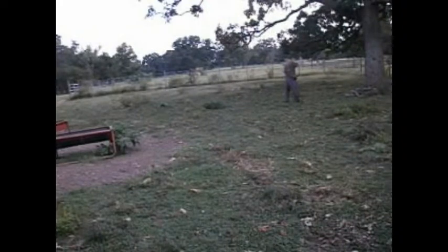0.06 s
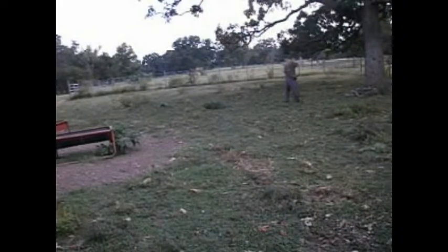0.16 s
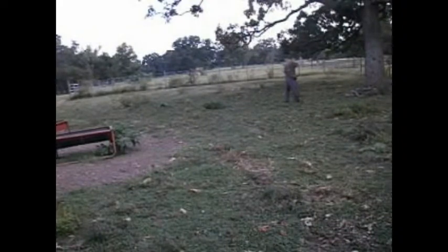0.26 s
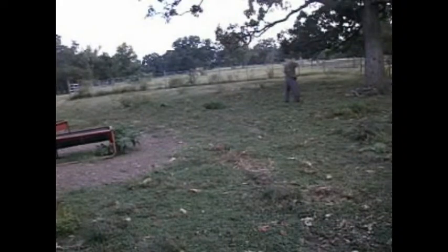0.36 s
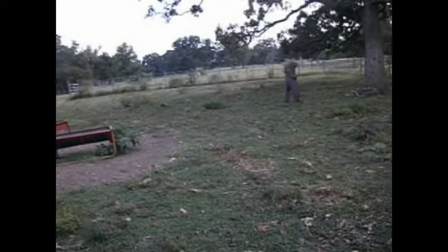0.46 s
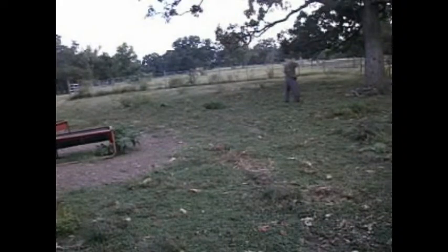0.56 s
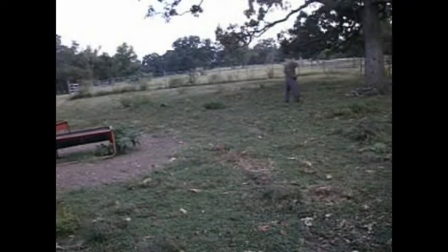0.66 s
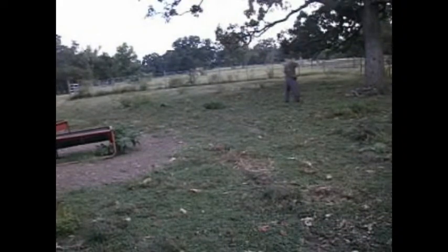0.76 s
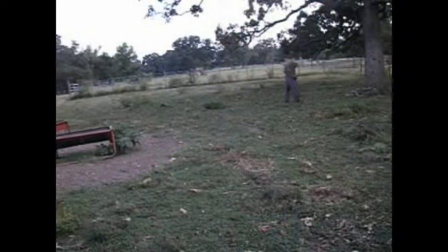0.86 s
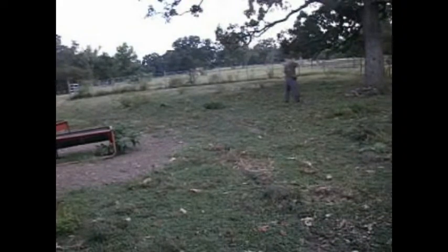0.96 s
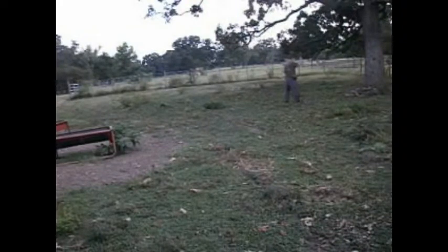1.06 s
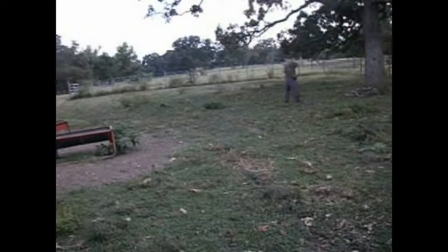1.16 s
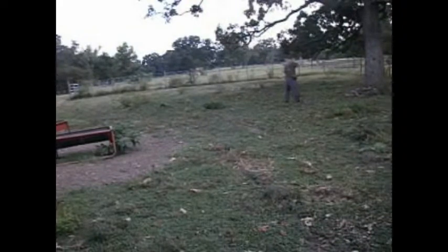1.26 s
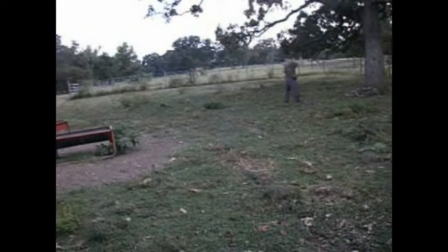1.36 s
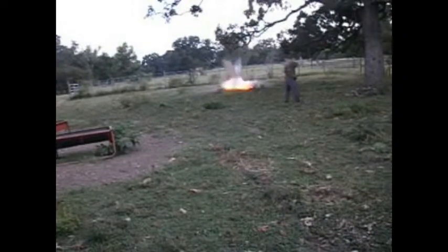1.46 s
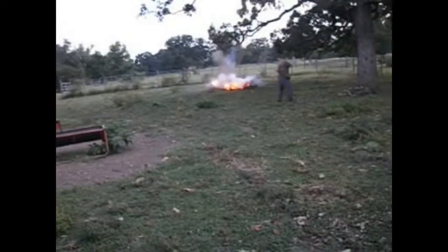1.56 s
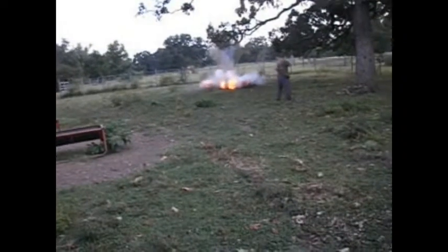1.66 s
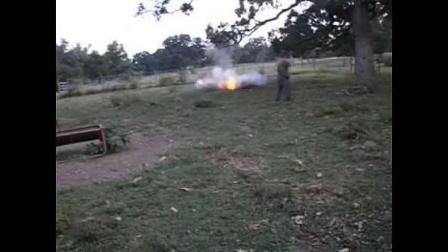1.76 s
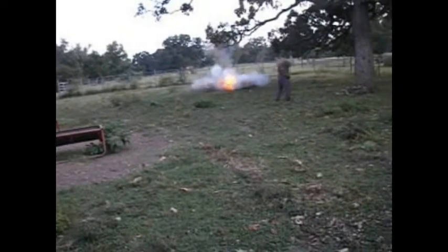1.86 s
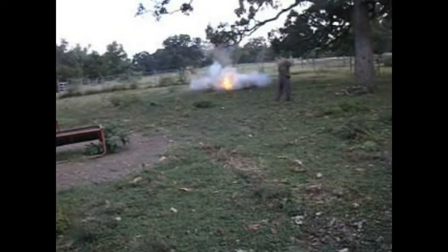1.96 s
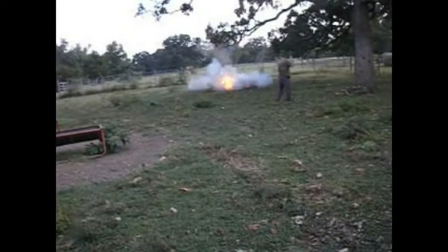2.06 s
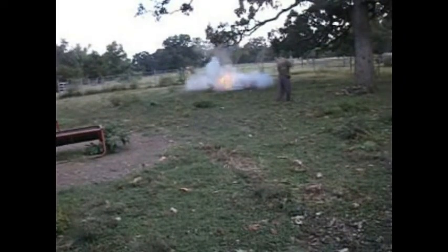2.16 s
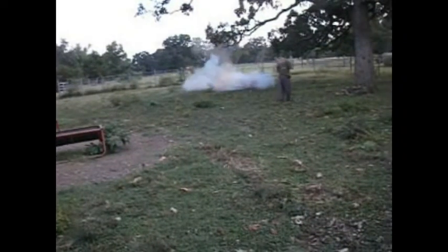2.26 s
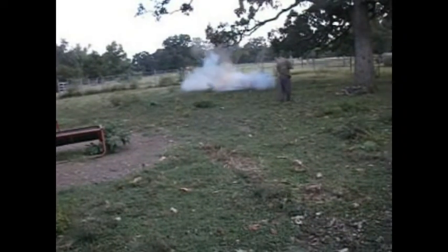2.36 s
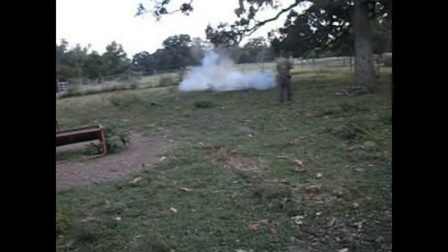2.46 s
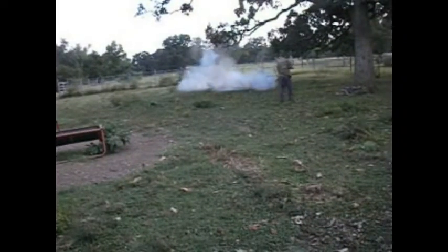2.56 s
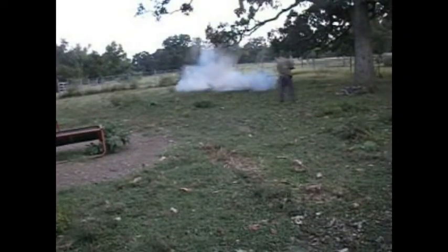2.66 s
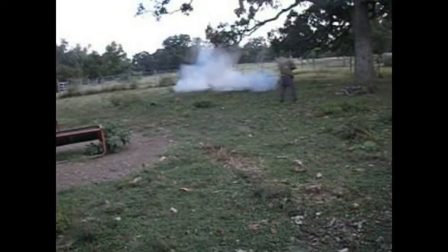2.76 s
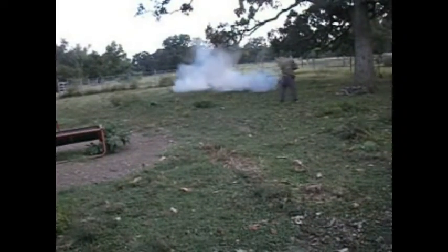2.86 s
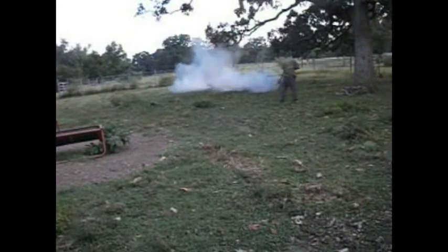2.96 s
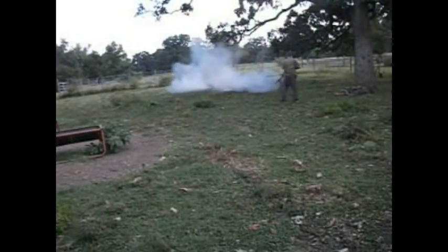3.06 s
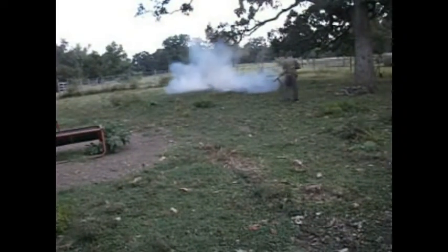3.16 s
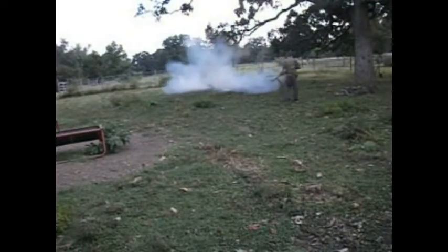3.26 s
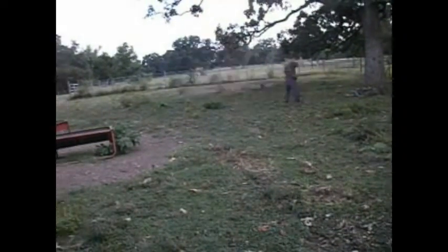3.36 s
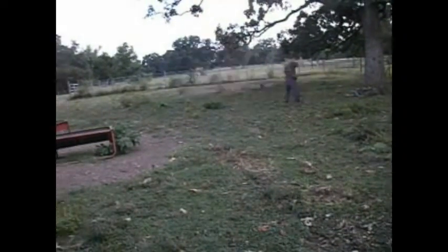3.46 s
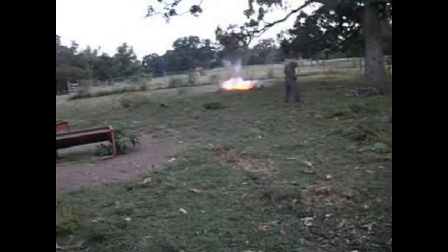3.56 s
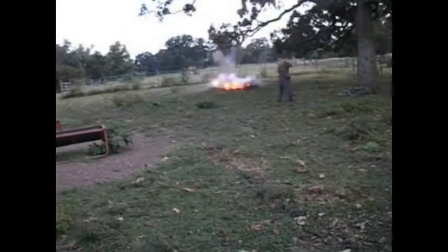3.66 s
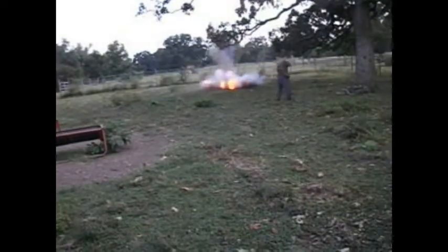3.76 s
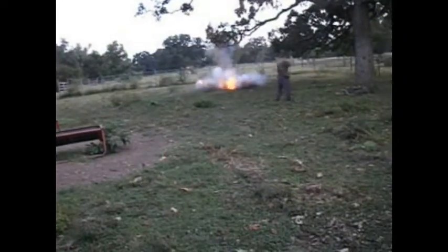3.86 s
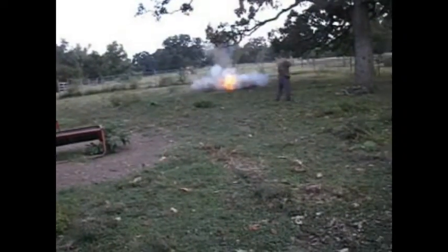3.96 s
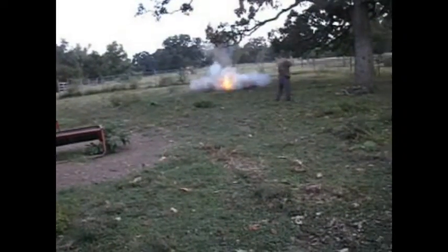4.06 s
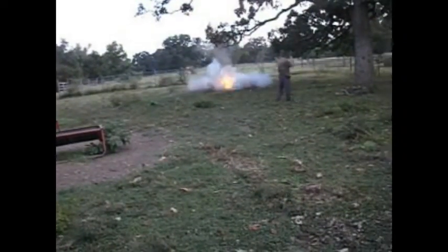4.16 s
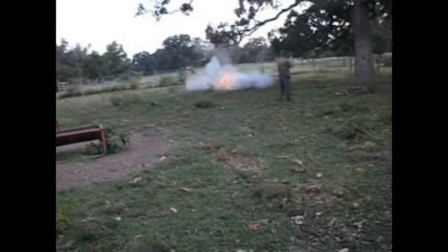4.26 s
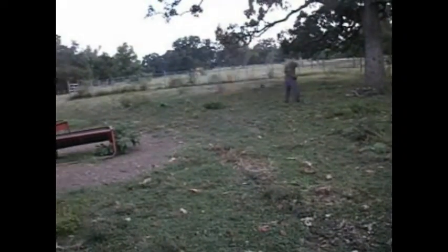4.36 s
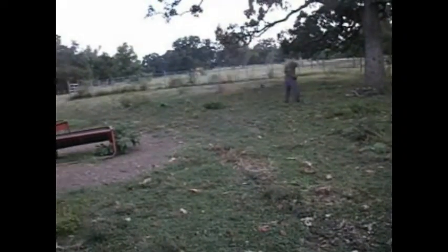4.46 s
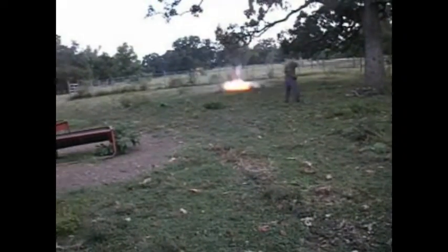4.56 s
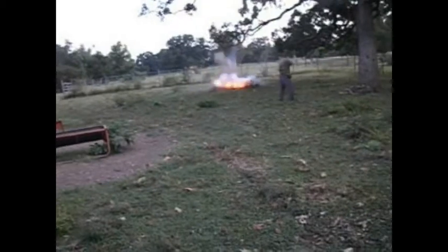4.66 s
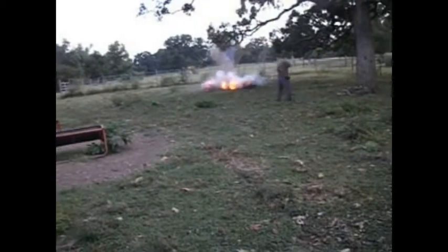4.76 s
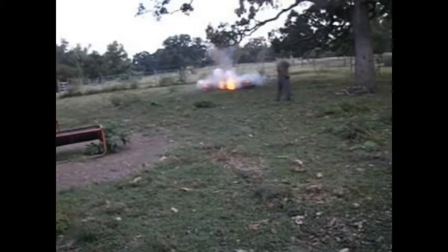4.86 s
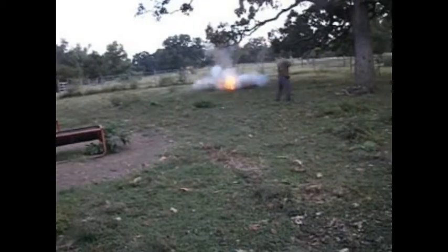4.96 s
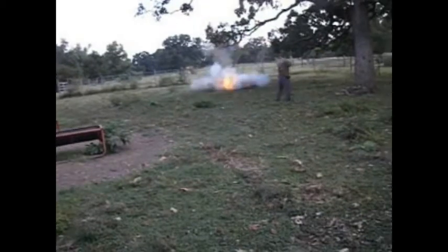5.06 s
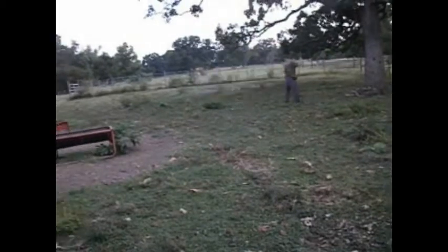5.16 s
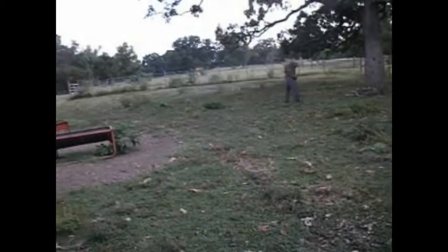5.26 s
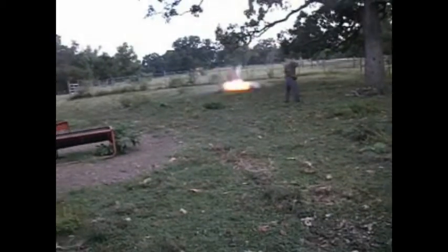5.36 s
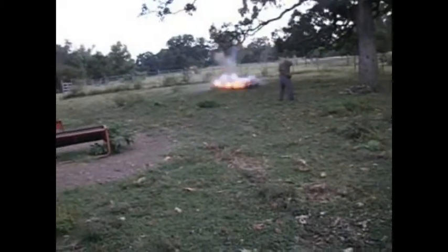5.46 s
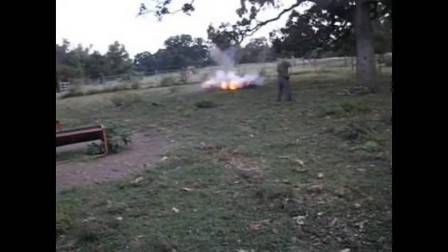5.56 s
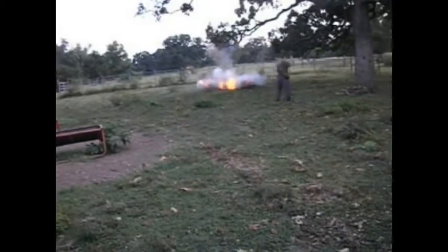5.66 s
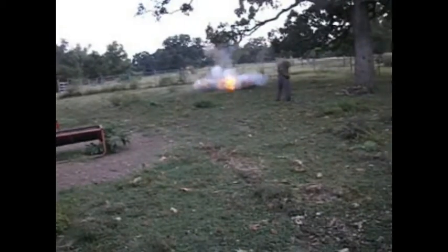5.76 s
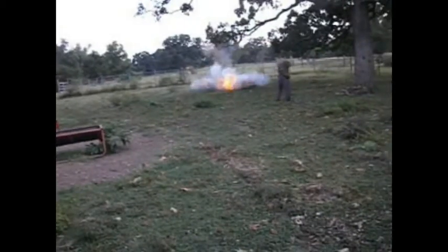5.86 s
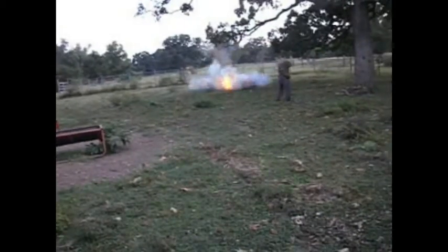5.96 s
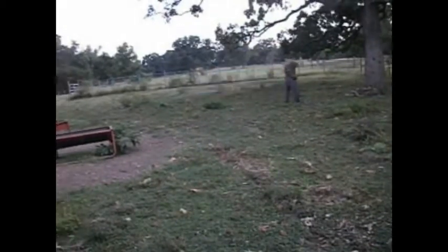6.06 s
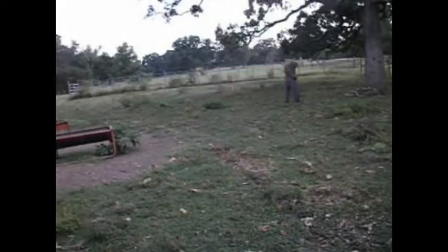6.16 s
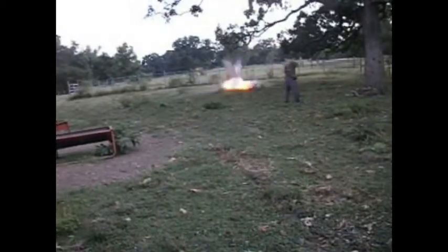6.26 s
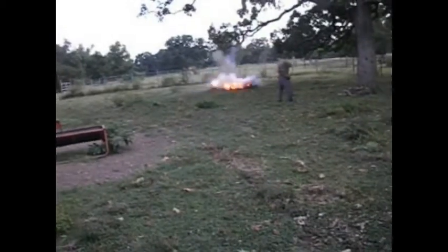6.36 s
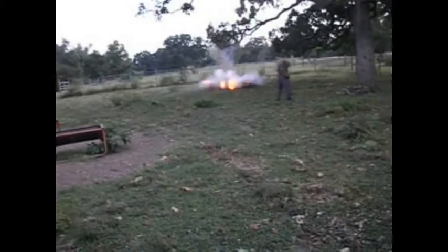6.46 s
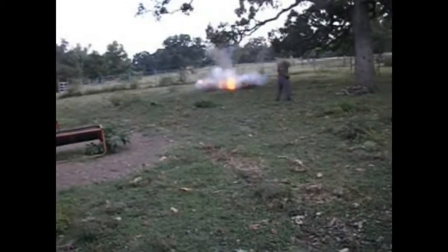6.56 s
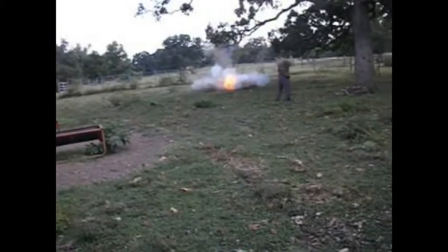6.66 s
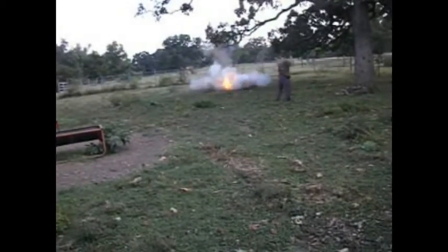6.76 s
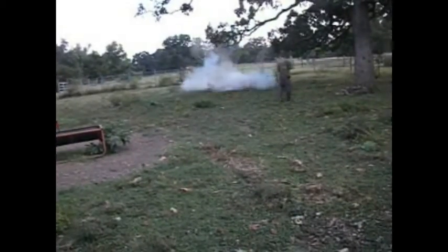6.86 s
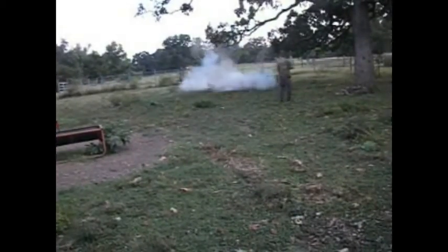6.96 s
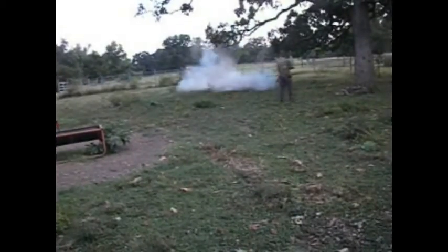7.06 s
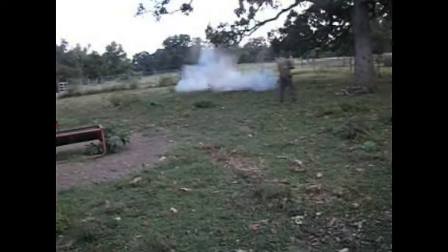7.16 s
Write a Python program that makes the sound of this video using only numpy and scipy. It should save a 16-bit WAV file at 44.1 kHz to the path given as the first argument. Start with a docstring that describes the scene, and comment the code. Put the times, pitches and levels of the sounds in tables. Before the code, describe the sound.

Five identical gritty explosions of a shot can outdoors, each a crack and boom with tree slapback, hard-cut together, finishing on a hollow dying echo.

```python
"""In an open field with a light breeze, a shot bursts a can: a crack, then a boom about 30 ms later.
Both overload a small 8-bit camera. The fireball heaves and hisses, the trees slap the bang back,
and the far tree line answers a second later with a hollow drone.
Hard cuts play the one explosion five times over; a last cut skips ahead into its dying echo.
Shaped noise makes the hisses and rumbles, fading sine waves make the thumps."""
import sys
import numpy as np
from scipy.fft import rfft, irfft, next_fast_len
from scipy.io import wavfile

SR = 44100
rng = np.random.default_rng(int(sys.argv[2]) if len(sys.argv) > 2 else 0)


def put_to_file(sound):
    """Save the sound as 16-bit audio at rate SR, in the file named by the first command-line argument."""
    columns = np.atleast_2d(sound).T  # one column per channel
    safe = np.clip(columns, -1, 1)
    whole_steps = np.round(safe * 32767)
    wavfile.write(sys.argv[1], SR, whole_steps.astype(np.int16))


N = 318843
TIME = np.arange(N) / SR

SHOT_S, BOOM_S = 1.4372, 1.4697  # the crack arrives, then the boom of the can
TREE_LINE_S = 1.015  # after the shot, the answer of the far tree line is at its height
FULL_SCALE, STEPS = 0.71, 128  # the 8-bit converter: its ceiling and its steps to either side

# Colour of the mid-range roar coming back from the trees: frequency_hz, relative level_db
ROAR_COLOUR = [(80, -25.5), (200, 1.5), (300, 2), (370, -1), (550, -0.5), (820, 1), (1100, -6.5),
               (1500, -11), (2200, -18.5), (3500, -27.5), (6000, -51.5)]
# Colour of the hiss of burning gas and of the leaves: frequency_hz, relative level_db
FIZZ_COLOUR = [(900, -15), (1500, -4), (2300, -2), (2950, 4), (3700, -5), (4900, -7), (5500, -22),
               (6200, -40.5)]


def amp(db):
    """Turn decibels into a plain gain."""
    return 10 ** (np.asarray(db) / 20)


def unit(x):
    """Scale a sound to an average strength (rms) of 1."""
    return x / np.sqrt(np.mean(x ** 2) + 1e-20)


def coloured(x, points, top_hz=SR):
    """Filter x with a curve of (frequency_hz, level_db) points, leaving nothing from top_hz up."""
    size = next_fast_len(N + 8192)  # spare room so the filter's tail does not wrap onto the start
    hz = np.fft.rfftfreq(size, 1 / SR)
    point_hz, point_db = np.transpose(points)
    # the ear hears pitch in ratios, so the points are joined on a log axis
    curve_db = np.interp(np.log(hz + 1), np.log(point_hz), point_db)
    gain = amp(curve_db) * (hz < top_hz)
    return irfft(rfft(x, size) * gain, size)[:N]


def closed_off(points):
    """Extend a colour so that it falls to -120 dB one octave above its last point."""
    return list(points) + [(2 * points[-1][0], -120)]


def noise(points):
    """Steady random noise of rms 1 in a given colour."""
    return unit(coloured(rng.standard_normal(N), closed_off(points)))


def scatter(points, per_second):
    """A crowd of small reflections at random moments and of random size, rms 1."""
    arrivals = rng.random(N) < per_second / SR
    return unit(coloured(arrivals * rng.standard_normal(N), closed_off(points)))


def decay(start, t60, attack):
    """A loudness curve that leaps up at start and falls 60 dB in t60 (all in seconds)."""
    t = np.maximum(TIME - start, 0)
    return (1 - np.exp(-t / attack)) * 1000 ** (-t / t60)


def onset(start, rise):
    """A smooth fade-in from start, taking about rise seconds."""
    return 1 - np.exp(-(np.maximum(TIME - start, 0) / rise) ** 2)


def fading(db, fall_db_per_s):
    """A gain that stands at db until the shot and then sinks steadily."""
    return amp(db - fall_db_per_s * np.maximum(TIME - SHOT_S, 0))


def far_answer(db, rise_db_per_s, fall_db_per_s):
    """A gain that climbs to db as the bang sweeps along the far tree line, then sinks."""
    t = TIME - SHOT_S - TREE_LINE_S
    return amp(db - rise_db_per_s * np.maximum(-t, 0) - fall_db_per_s * np.maximum(t, 0))


def background():
    """Very quiet open air, and a light breeze moving over the microphone with one slow gust."""
    # colour of the open air: frequency_hz, relative level_db
    air_colour = [(60, -4), (180, -9.5), (420, -4.5), (700, -8.5), (1200, -13), (3000, -16), (5200, -17.5),
                  (5900, -29.5)]
    # colour of wind on the microphone: frequency_hz, relative level_db
    buffet_colour = [(8, -2), (30, -7), (60, -5.5), (86, -1.5), (130, -10.5), (300, -31.5)]
    air_db, breeze_db = -56, -55.5
    gust_start_s, gust_length_s, gust_db = 1.15, 2.5, 12  # gust_db: its height over the breeze
    gust = np.sin(np.pi * np.clip((TIME - gust_start_s) / gust_length_s, 0, 1))
    air = amp(air_db) * noise(air_colour)
    breeze = amp(breeze_db + gust_db * gust) * noise(buffet_colour)
    return air + breeze


def rolling_echo():
    """Near trunks scatter the bang back; the far tree line answers later, its treble dying first."""
    # colour of the low rumble: frequency_hz, relative level_db
    rumble_colour = [(20, -39.5), (45, -9.5), (75, -2), (110, -2.5), (155, -3), (220, -16.5), (400, -32)]
    # colour of the hollow drone, with narrow peaks: frequency_hz, relative level_db
    hollow_colour = [(55, -26), (85, -4), (101, -1.5), (118, -9), (170, -37), (270, -25.5), (303, -6),
                     (335, -28), (500, -49.5)]
    # hypot adds the near and the far part as energies
    rumble_gain = np.hypot(fading(db=-27.0, fall_db_per_s=8.5),
                           far_answer(db=-29.5, rise_db_per_s=68, fall_db_per_s=24))
    roar_gain = np.hypot(fading(db=-32.5, fall_db_per_s=11.5),
                         far_answer(db=-27.0, rise_db_per_s=20, fall_db_per_s=22))
    drone_gain = far_answer(db=-27, rise_db_per_s=30, fall_db_per_s=17)
    leaves_gain = far_answer(db=-41.5, rise_db_per_s=13.5, fall_db_per_s=55)
    rumble = rumble_gain * scatter(rumble_colour, per_second=460)
    roar = roar_gain * scatter(ROAR_COLOUR, per_second=4500)
    drone = drone_gain * noise(hollow_colour)
    leaves = leaves_gain * noise(FIZZ_COLOUR)
    return onset(SHOT_S, rise=0.078) * (rumble + roar + drone + leaves)


def slaps():
    """Single trees slap the crack back as short dull bursts of noise."""
    # the slaps: start_s, level_db
    tree_slaps = [(1.515, -19), (1.705, -27), (1.906, -22.5), (1.985, -24), (2.425, -24.5)]
    envelope = np.zeros(N)
    for start_s, level_db in tree_slaps:
        envelope += amp(level_db) * decay(start_s, t60=0.068, attack=0.0065)
    return envelope * noise(ROAR_COLOUR)


def thumps():
    """Distinct echoes of the boom: each swings over and under a few times and dies."""
    # the echoes, most far ones rising softly: start_s, level_db, pitch_hz, t60_s, rise_s
    boom_echoes = [(1.5158, 3, 175.6, 0.027, 0.00076), (1.939, -13.5, 116.3, 0.1, 0.0057),
                   (1.979, -8, 124.4, 0.12, .014), (2.346, -8.5, 120.4, 0.14, .014),
                   (2.379, -5.5, 104.6, 0.086, 0.011), (3.01, -18, 100.9, 0.21, .014)]
    total = np.zeros(N)
    for start_s, level_db, pitch_hz, t60_s, rise_s in boom_echoes:
        swing = np.sin(2 * np.pi * pitch_hz * (TIME - start_s))
        total += amp(level_db) * decay(start_s, t60_s, rise_s) * swing
    return total


def fireball():
    """Burning gas hisses and thins out."""
    return onset(SHOT_S, rise=0.043) * fading(db=-42.5, fall_db_per_s=12) * noise(FIZZ_COLOUR)


def fireball_push(start_hz=230, end_hz=112, sag_s=0.00711, width_s=0.0085):
    """The expanding gas heaves a few times, its pitch sagging as it grows."""
    t = np.maximum(TIME - BOOM_S, 0)
    # the pitch slides from start_hz to end_hz; adding it up over time counts the swings
    cycles = end_hz * t + (start_hz - end_hz) * sag_s * (1 - np.exp(-t / sag_s))
    swell = np.exp(-(t / width_s - 1) ** 2)  # strongest width_s after the boom
    return amp(5) * swell * np.sin(2 * np.pi * cycles)


def blast():
    """A faint lead-in, the crack and the boom; the crack lingers among the nearby trees."""
    # colour of the sharp crack: frequency_hz, relative level_db
    crack_colour = [(30, -3.5), (150, 6.5), (280, 0.5), (450, -1), (650, 3), (860, 0.5), (1150, -7),
                    (1900, -8.5), (3000, -11), (4900, -11.5), (5600, -17.5), (6200, -40)]
    # colour of the deep boom: frequency_hz, relative level_db
    boom_colour = [(15, -7.5), (35, -3), (70, -22.5), (135, -5.5), (200, -5), (260, -7), (400, -13.5),
                   (900, -38.5)]
    lead = amp(-16.0) * decay(SHOT_S - 0.0045, t60=0.13, attack=0.0024)
    direct = amp(4.5) * decay(SHOT_S, t60=0.14, attack=0.003)
    nearby = amp(-12.0) * decay(SHOT_S, t60=0.44, attack=0.0043)
    boom = amp(-6.5) * decay(BOOM_S, t60=0.22, attack=0.0014)
    return (lead + direct + nearby) * noise(crack_colour) + boom * noise(boom_colour)


def scene():
    """One explosion in the field."""
    echoes = rolling_echo() + slaps() + thumps()
    explosion = fireball() + fireball_push() + blast()
    return (background() + echoes + explosion)[None]


def converter(x, count=4):
    """Keep one sample in count, in coarse steps: near silence the last bit flips, a fluttering hiss."""
    kept = np.zeros(N)
    kept[::count] = (np.floor(x[::count] * STEPS) + 0.5) / STEPS
    return count * kept  # makes up for the zeros in between


def replay(explosion):
    """Join pieces of the one explosion: four cuts jump back before the shot, the last skips ahead."""
    # the pieces: start_s, source_s (the moment in the explosion that the piece starts from)
    pieces = [(0, 0), (3.341, 1.239), (4.405, 1.239), (5.190, 1.239), (6.071, 1.239), (6.884, 2.352)]
    starts, sources = np.round(np.transpose(pieces) * SR).astype(int)
    piece = np.searchsorted(starts, np.arange(N), side="right") - 1
    return explosion[np.arange(N) - starts[piece] + sources[piece]]


def record(dry, hardness=5):
    """The camera overloads and digitises coarsely in a narrow band; the cuts come after and tick faintly."""
    # the camera's narrow band: frequency_hz, level_db
    camera_band = [(20, 0.5), (4700, 0), (5400, -4), (6000, -12.5), (6400, -24), (6800, -41), (7900, -43),
                   (8300, -71.5)]
    band_hz, top_hz = 8100, 15900  # nothing passes above these: in the camera, after the cuts
    drive = dry[0] / FULL_SCALE
    # loud peaks are squashed against the ceiling; a higher hardness bends more sharply
    squashed = drive / (1 + np.abs(drive) ** hardness) ** (1 / hardness)
    digitised = FULL_SCALE * converter(squashed)
    joined = replay(coloured(digitised, camera_band, band_hz))
    return coloured(joined, [(top_hz, 0)], top_hz)[None]


dry = scene()
out = record(dry)
put_to_file(out)
```